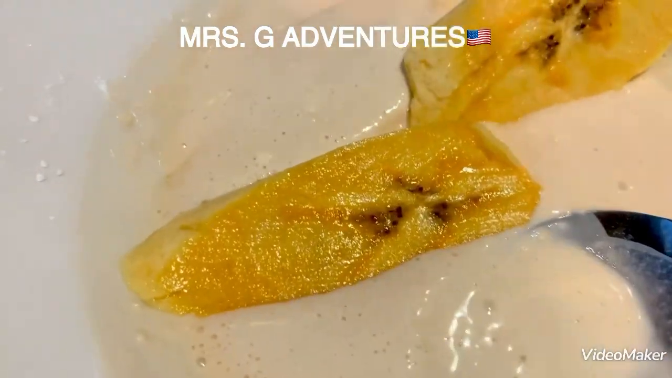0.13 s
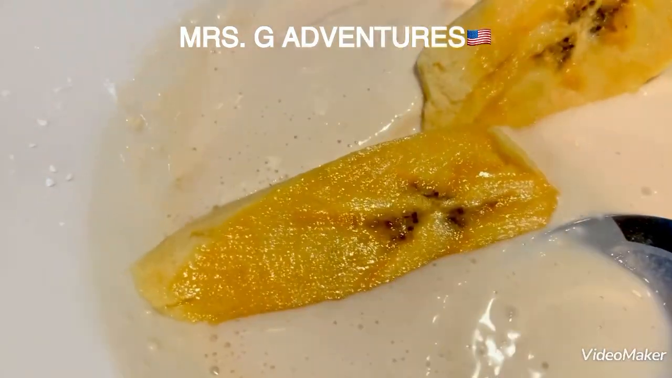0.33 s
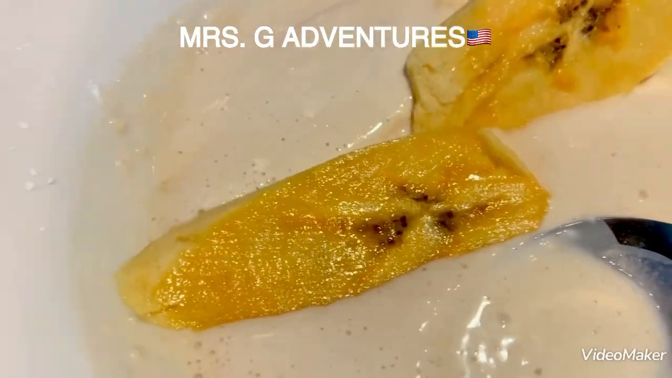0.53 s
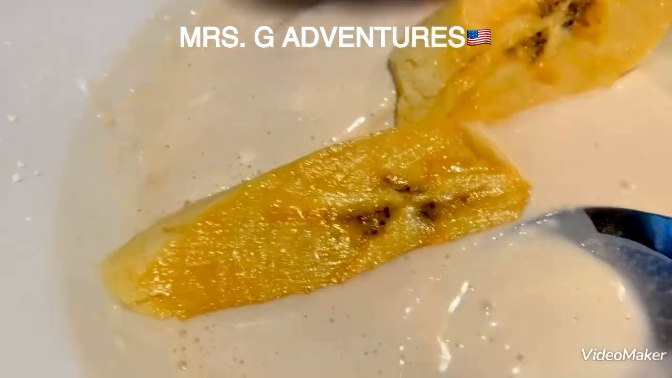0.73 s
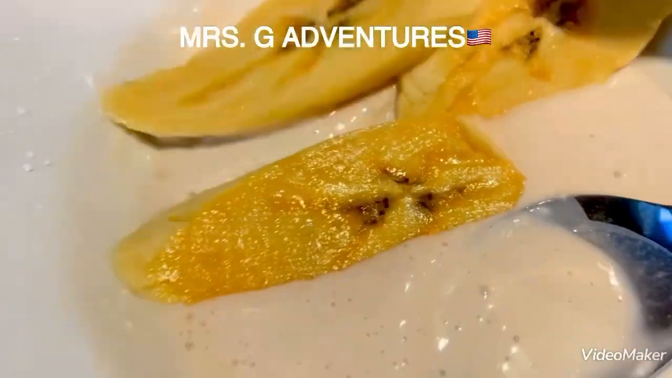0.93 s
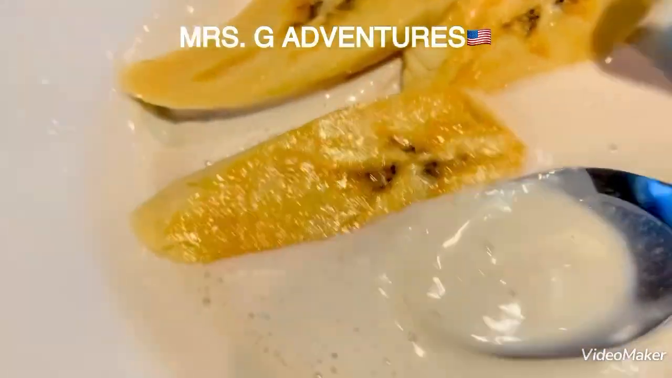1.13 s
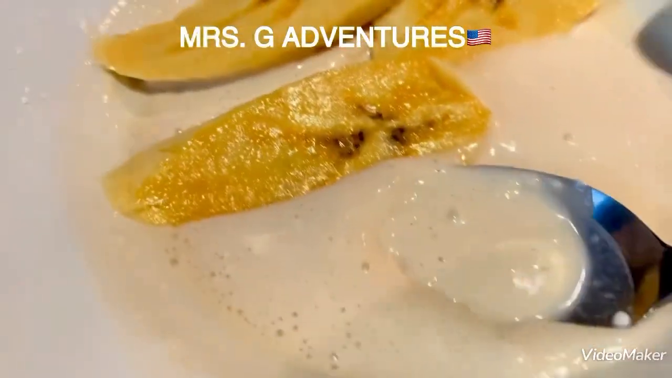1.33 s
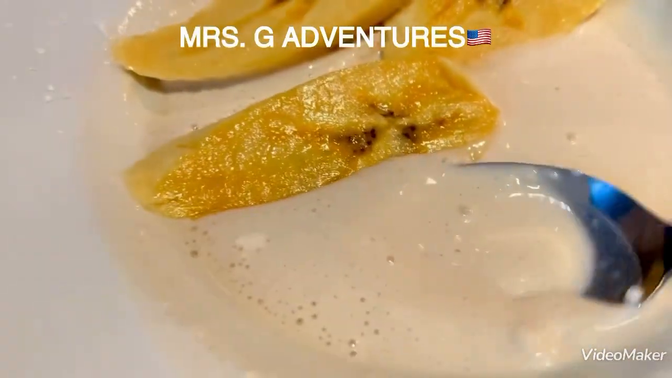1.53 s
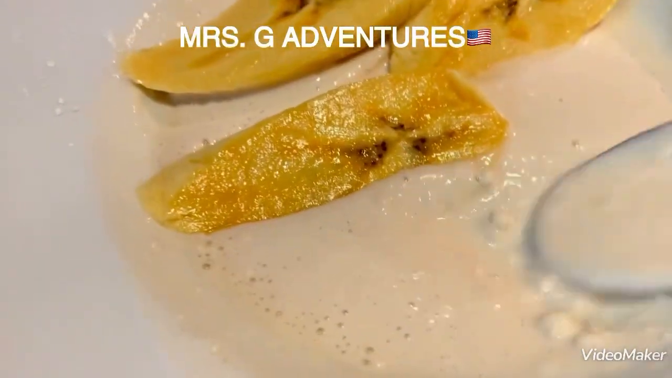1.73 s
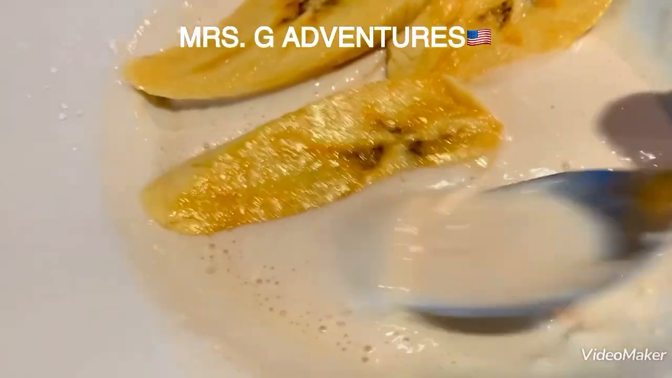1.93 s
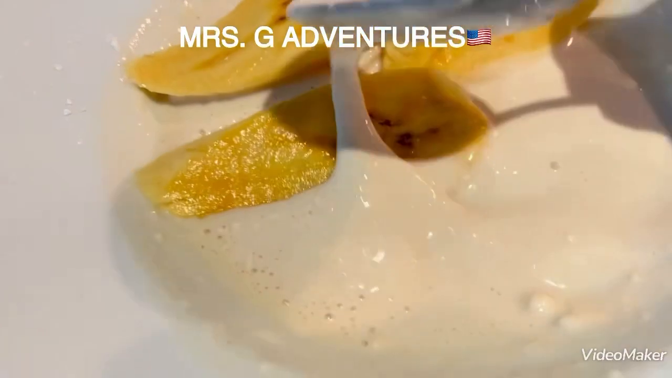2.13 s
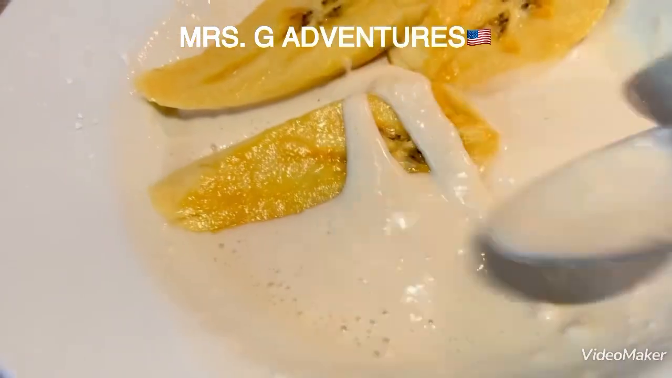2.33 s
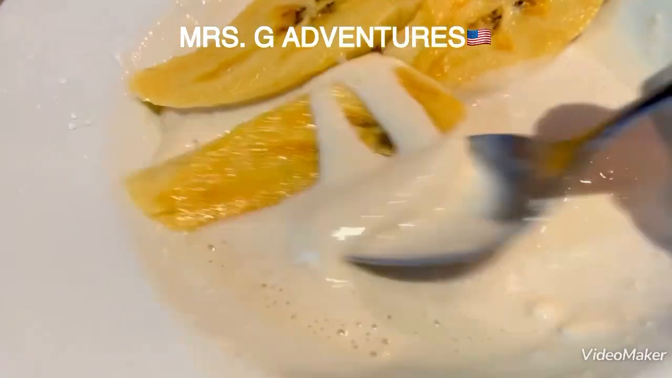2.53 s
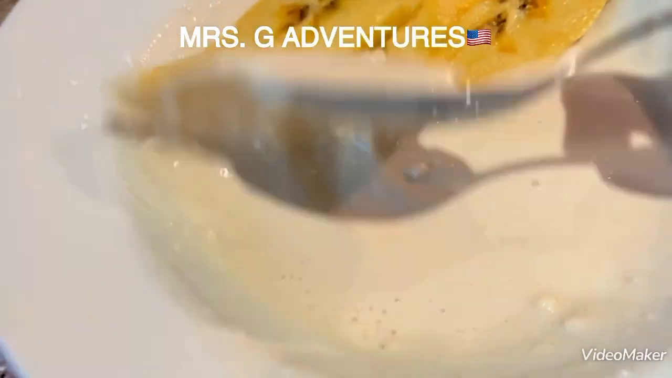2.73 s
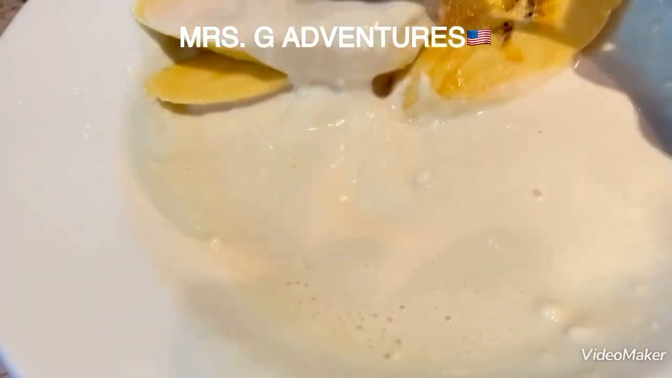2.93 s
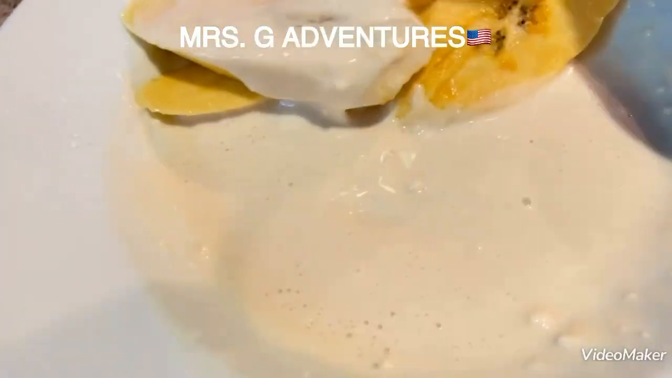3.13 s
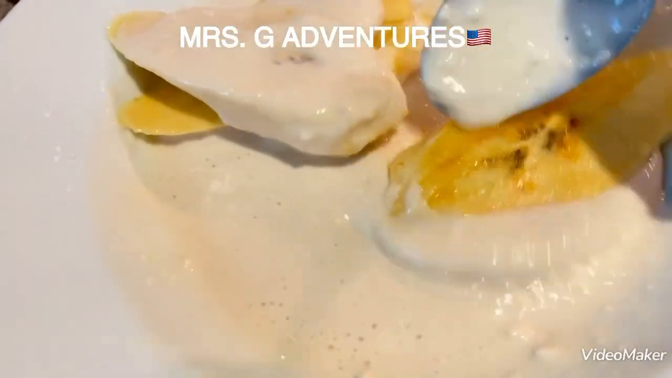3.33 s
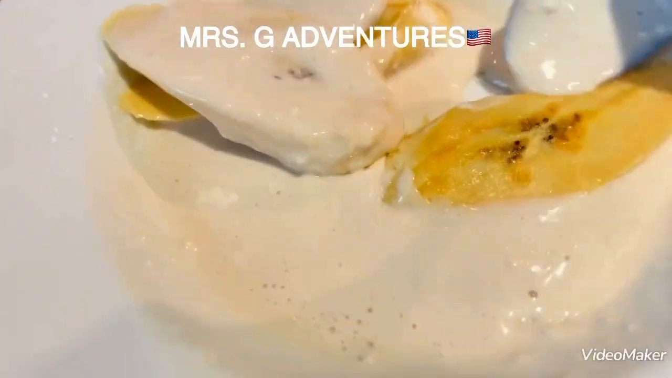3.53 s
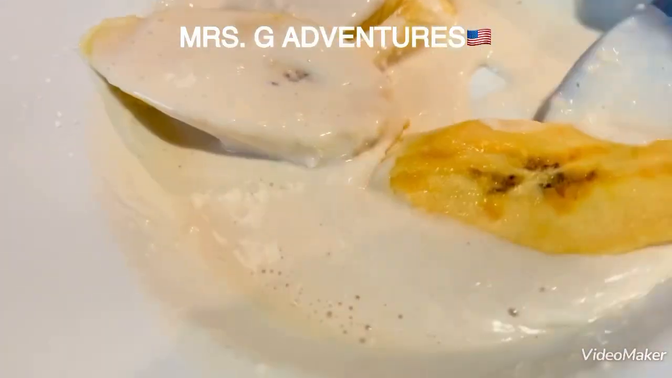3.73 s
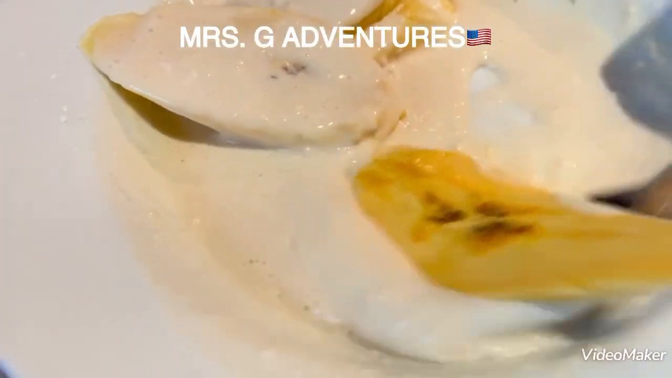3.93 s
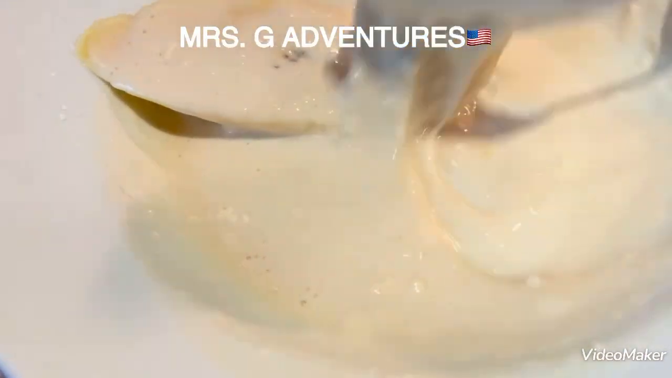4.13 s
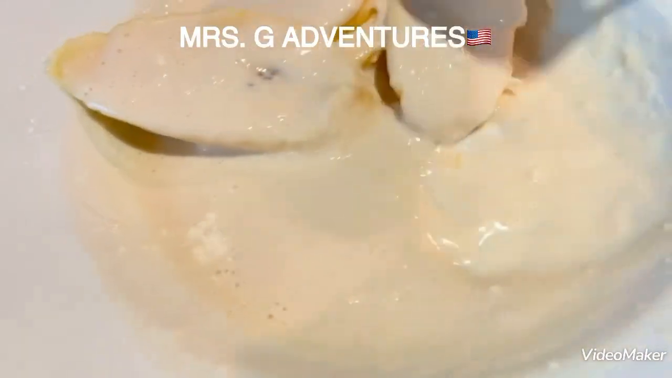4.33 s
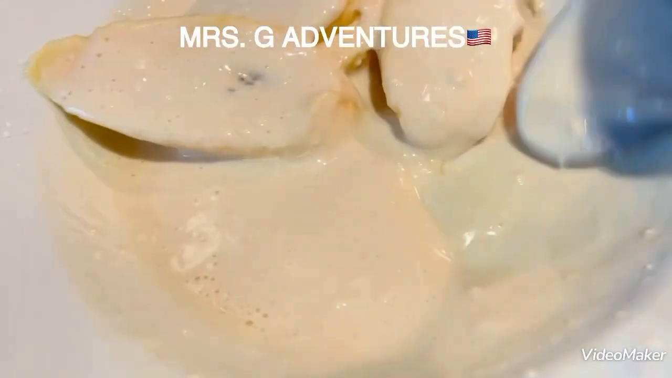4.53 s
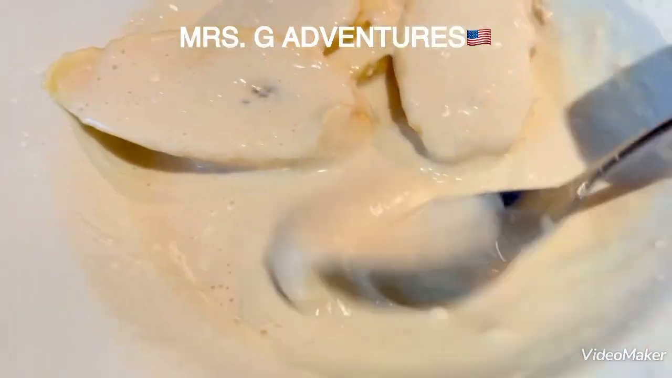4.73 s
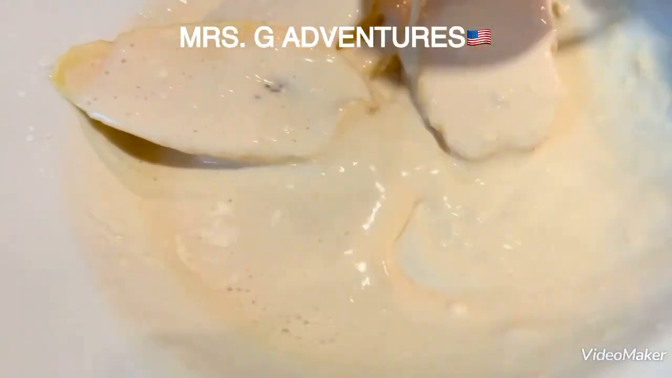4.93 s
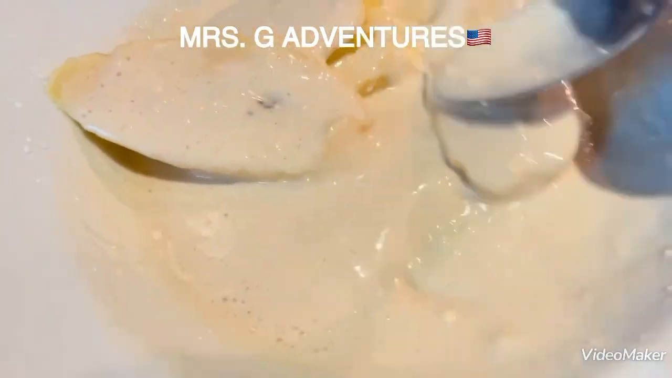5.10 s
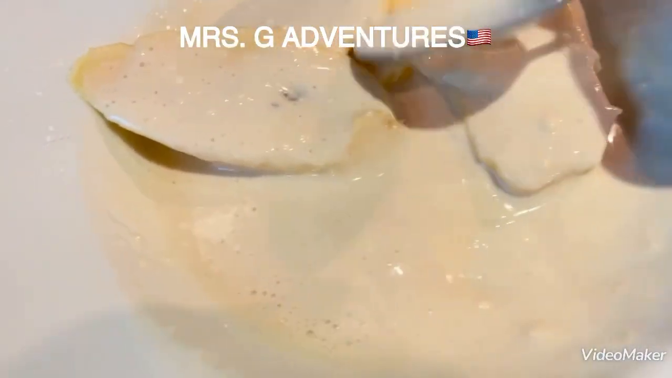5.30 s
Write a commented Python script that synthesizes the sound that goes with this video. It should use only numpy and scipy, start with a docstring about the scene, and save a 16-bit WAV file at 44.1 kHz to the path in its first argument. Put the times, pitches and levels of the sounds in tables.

```python
"""Spoon turning battered fruit on a plate

A steel spoon turns slices of fruit in thick batter on a ceramic plate, close by in a kitchen.
Blows: damped modes of spoon and plate, a bright noise tick and a thud of low, dense counter modes.
Strokes: random slips on the glaze drive the same modes. Batter: short high snaps and fizzing noise.
Under it all a low appliance hum of shaped noise; a small room adds reflections and a faint tail."""
import sys
import numpy as np
from scipy import signal
from scipy.fft import rfft, irfft, next_fast_len
from scipy.io import wavfile

SR = 44100
rng = np.random.default_rng(int(sys.argv[2]) if len(sys.argv) > 2 else 0)


def persist_wave(psi):
    """Save psi, clipped to +-1, as 16-bit WAV."""
    counts = np.round(np.clip(psi, -1, 1) * 32767).astype(np.int16)
    wavfile.write(sys.argv[1], SR, np.atleast_2d(counts).T)


N = 236618
TIME_S = np.arange(N) / SR
RING_TIME_S = TIME_S[:16384]

# hum spectrum: (frequency [Hz], level [dB])
HUM_SPECTRUM = [(25, -21), (52, -3), (88, 3.5), (135, -10.5), (195, -2), (320, -2.5), (410, -6), (540, -18),
                (1050, -23), (2200, -29), (3900, -33.5), (5300, -42), (8900, -48), (11000, -37.5),
                (12600, -59.5), (15000, -73.5)]
# hum, side against mid: (frequency [Hz], level [dB])
HUM_SIDE_SPECTRUM = [(80, -27), (220, -21.5), (700, -2), (4000, -11)]
# largest films of batter snap: (time [s], level [dB])
FILM_SNAPS = [(.1183, -19), (.637, -21), (.7095, -25.5), (.787, -19), (2.435, -18), (2.698, -18.5),
              (2.738, -26), (4.7463, -15.5), (4.9799, -1.5), (5.054, -24.5)]
# batter tears as slices pull free: (peak time [s], length [s], level [dB])
TEARS = [(.63, 0.064, -71), (0.778, 0.032, -49.5), (2.733, 0.086, -63.5), (4.221, .015, -40.5),
         (5.029, 0.048, -66)]
# spoon strokes over the glaze: (peak time [s], length [s], rasp level [dB])
STROKES = [(0.126, 0.04, -54.5), (1.116, 0.019, -39), (1.537, 0.02, -30), (1.764, 0.042, -49.5),
           (2.843, 0.009, -43.5), (3.849, 0.072, -54), (4.716, 0.028, -49.5)]
# spoon meets plate: (time [s], strength [dB], contact cut-off [Hz], plate ring re strength [dB],
# counter thud re strength [dB], gap to first rebound [s]); gaps up to 2 ms give no rebound
SPOON_BLOWS = [ (.861, -7, 5000, 0, 4.5, 0), (1.107, -10, 3200, 11, -1.5, 0),
               (1.171, -15.5, 3060, -14, -16, 0), (1.2184, 9, 9500, 11.5, -3, .0261),
               (1.6643, -9, 3700, -10, -4, 0.00034), (1.755, -21, 6260, 16, -9, 0),
               (1.8403, 16, 2480, -7.5, -8, 0), (2.3657, 17.5, 5700, -12.5, -23, 0),
               (2.4427, 0, 3000, 0, -24.5, 0.0047), (2.8466, 2.5, 2800, -8, -7, 0),
               (3.249, -4, 3600, -18, -3.5, 0), (3.5753, 19, 4450, 12, -5, .0306),
               (3.777, -17, 3880, -1, -6, 0), (3.985, 28.5, 1120, -19, -7.5, 0),
               (4.2126, -7.5, 5200, 0, 6.5, 0.0034), (4.542, 15, 2500, -3, -10.5, 0),
               (4.5652, 15.5, 3030, 5.5, -8.5, 0.022), (4.981, -10, 2057, 0, -9, 0)]
# quickly damped modes, spoon pressed on plate: (frequency [Hz], spectral peak [dB], t60 [s])
CLACK_MODES = [(768, -14.5, 0.0067), (1028, -1, 0.03), (1444, -14, .022), (1747, 1, 0.023),
               (2320, -9, 0.016), (2820, -3.5, 0.035), (3805, -2.5, 0.017), (4190, -9, 0.0045),
               (6010, -4, 0.027), (6430, -11, 0.028), (7940, -3, 0.0073), (9800, -17.5, 0.006),
               (11100, -11, 0.036)]
# plate mode pitches: (frequency [Hz])
PLATE_PITCHES_HZ = [1027, 1685, 2799, 3470, 3967, 6422, 6800, 7120, 9400]
# plate modes, in the order of the pitches: (spectral peak [dB], t60 [s])
PLATE_MODES = [(-6, 0.036), (-3.5, 0.078), (-6.5, 0.17), (-16.5, 0.014), (0.5, 0.065), (-1.5, 0.1),
               (-5, 0.043), (-16.5, 0.026), (-7, 0.054)]
# spoon mode pitches: (frequency [Hz])
SPOON_PITCHES_HZ = [1690, 1880, 3176, 3820, 4090, 5143, 7838, 9540, 11140]
# spoon modes, in the order of the pitches: (spectral peak [dB], t60 [s])
SPOON_MODES = [(-13, 0.14), (-9.5, 0.036), (-21, 0.15), (-15.5, 0.013), (-11, .04), (-5.5, 0.13),
               (-15.5, 0.066), (-12.5, 0.099), (-4.5, 0.026)]
# counter thud spectrum, a dense crowd of low modes: (frequency [Hz], level [dB])
COUNTER_SPECTRUM = [(50, -21.5), (100, -4.5), (170, -0.5), (300, 0.5), (400, -2.5), (520, -7), (720, -5.5),
                    (1050, -13), (2000, -38.5)]
# spectrum of rasp and crack on the glaze: (frequency [Hz], level [dB])
RASP_SPECTRUM = [(100, -25), (500, -14.5), (1000, -5), (1800, 1), (2500, 1.5), (3900, -5), (4800, -11.5),
                 (6500, -5.5), (8200, -6.5), (9000, -12.5), (10500, -0.5), (11500, 0.5), (12400, -20),
                 (14000, -38.5)]
# spectrum of contact ticks and batter noise: (frequency [Hz], level [dB])
TICK_SPECTRUM = [(200, -30), (1500, -13.5), (4000, -20.5), (5000, -20), (7800, -8.5), (9000, -17.5),
                 (11100, 1), (13000, -12.5)]
# microphone response: (frequency [Hz], level [dB])
MIC_RESPONSE = [(11400, 0), (12300, -10.5), (13200, -15), (15000, -26)]
# left port re right: (frequency [Hz], phase lead [rad], level [dB])
PORT_DIFFERENCE = [(101, 0.0029, 0.33), (491.7, 0.14, -3.5), (1280, 0.68, -1.2), (2160, 0.66, 0.5),
                   (4440, 0.59, -2), (6470, 0.088, 0), (11000, 0, 0)]
# span in which the spoon rings freely; batter and fingers muffle it otherwise: (start [s], end [s])
SPOON_FREE_SPAN_S = (1.05, 1.6)

HUM_DB, DIP_DB, DIP_S, DIP_LENGTH_S = -54, -16, 1.337, 0.054
# film pitch rises with strength; SNAP_HZ is the pitch at 0 dB
SNAPS_PER_S, SNAP_DB, SNAP_SCATTER_DB = 20, -31.5, 2.5
SNAP_HZ, SNAP_HZ_PER_DB, SNAP_T60_S = 10920, 64, .0018
RELEASE_SHARE = .8  # stroke decay re its length
# skid after a blow with contact above BARE_HZ (bare glaze); SKID_DB at 0 dB strength
SKID_DELAY_S, SKID_RISE_S, SKID_FALL_S = 0.042, 0.035, 0.036
SKID_DB, SKID_DB_PER_DB, BARE_HZ = -57, 0.85, 1800
SPOON_STRUCK_DB, SPOON_RUBBED_DB, SPOON_MUFFLED_DB = 18.5, 18.5, -31
# late spoon ring: close pairs of modes beat; twins above TWIN_DAMPING_HZ die sooner
SPOON_BEAT_HZ, SPOON_BEAT_DB, TWIN_DAMPING_HZ = 37, -12.5, 5400
# each rebound is weaker, softer and sooner than the contact before
REBOUND_LOSS_DB, REBOUND_CONTACT_SHARE, REBOUND_GAP_SHARE, MIN_GAP_S = 10.5, 0.44, .82, .002
# tick grows with strength and hardness; TICK_DB at 0 dB strength and USUAL_CONTACT_HZ
TICK_DB, TICK_DB_PER_DB, TICK_DB_PER_OCTAVE, USUAL_CONTACT_HZ = -10.5, 0.48, 17.5, 4000
CEILING, TOP_HZ = .5, 15800  # peak limit [full scale], top of the band


def undb(db):
    """Decibels to gain."""
    return 10 ** (np.asarray(db) / 20)


def unit(x):
    """Scale to an rms of one."""
    return x / np.sqrt(np.mean(x ** 2))


def on_bins(points, size):
    """Interpolate a (Hz, value) curve over log frequency on the bins of a transform."""
    hz, value = np.transpose(points)
    bins_hz = np.fft.rfftfreq(size, 1 / SR)
    return np.interp(np.log(bins_hz + 1), np.log(hz), value)


def through(x, response):
    """Convolve each channel, keeping the length."""
    x = np.atleast_2d(x)
    return signal.oaconvolve(x, np.atleast_2d(response), axes=-1)[:, :x.shape[-1]]


def colour(x, points, size=1024):
    """Minimum-phase filter with the given (Hz, dB) spectrum."""
    cepstrum = irfft(np.log(undb(on_bins(points, size))))
    # folded onto positive time: causal
    cepstrum[1:size // 2] *= 2
    cepstrum[size // 2 + 1:] = 0
    return through(x, irfft(np.exp(rfft(cepstrum))))


def soften(x, hz, order=2):
    """Low-pass: a longer contact leaves out the treble."""
    b, a = signal.butter(order, min(hz, SR / 2 - 1000), fs=SR)
    return signal.lfilter(b, a, x)


def burst(t60_s):
    """Dying noise of unit energy, unrelated left and right."""
    decay = np.exp(-np.log(1000) * RING_TIME_S / t60_s)
    x = rng.standard_normal((2, len(RING_TIME_S))) * decay
    return x / np.sqrt(np.sum(x ** 2, axis=1, keepdims=True))


def grains(rate, scatter_db):
    """Random clicks of uneven size, rate per second, at unit rms."""
    clicks = (rng.random(N) < rate / SR) * rng.choice([-1, 1], N)
    size_db = scatter_db * np.clip(rng.standard_normal(N), -2, 2)
    return unit(clicks * undb(size_db))


def add(out, time_s, x):
    """Mix a sound in at a time."""
    start = int(time_s * SR)
    out[:, start:start + x.shape[-1]] += x[..., :N - start]


def ringing(modes, spread):
    """Damped sines (mode, channel, time); port phase difference grows with pitch up to 4 kHz."""
    hz, db, t60_s = np.transpose(modes)[:, :, None, None]
    decay_per_s = np.log(1000) / t60_s
    sign = (-1) ** np.arange(len(modes))[:, None, None]
    side = rng.choice([-1, 1], hz.shape) * np.array([[.5], [-.5]])
    phase_rad = spread * np.minimum(hz / 4000, 1) * side
    envelope = undb(db) * 2 * decay_per_s / SR * np.exp(-decay_per_s * RING_TIME_S)
    return sign * envelope * np.sin(2 * np.pi * hz * RING_TIME_S + phase_rad)


def twins(modes, spread, twin_db, longer, split_hz):
    """Fainter, slightly detuned and longer ringing partners of the modes."""
    hz, db, t60_s = modes.T
    twin_t60_s = t60_s * longer * np.minimum(TWIN_DAMPING_HZ / hz, 1)
    return ringing(np.column_stack([hz + split_hz, db + twin_db, twin_t60_s]), spread)


def twinned(pitches_hz, modes, spread, twin_db, longer, split_hz):
    """Each mode has a faint twin close by that the batter hardly damps."""
    main = np.column_stack([pitches_hz, modes])
    return ringing(main, spread) + twins(main, spread, twin_db, longer, split_hz)


def struck(shapes, scatter_db):
    """Sum of modes; each point of contact weights them a little differently."""
    return np.tensordot(undb(scatter_db * rng.standard_normal(len(shapes))), shapes, 1)


def muffling_db(time_s):
    """Gain on the spoon's own ring: 0 dB while free, low while muffled."""
    return 0 if SPOON_FREE_SPAN_S[0] < time_s < SPOON_FREE_SPAN_S[1] else SPOON_MUFFLED_DB


def hum():
    """Steady low rush of a kitchen appliance, dipping briefly once; bass alike at both ports."""
    mid, side = rfft(rng.standard_normal((2, N))) * undb(on_bins(HUM_SPECTRUM, N))
    side = side * undb(on_bins(HUM_SIDE_SPECTRUM, N))
    rush = unit(irfft([mid + side, mid - side], N))
    dip = np.exp(-((TIME_S - DIP_S) / DIP_LENGTH_S) ** 2)
    return rush * undb(HUM_DB + DIP_DB * dip)


def kitchen(x):
    """Quick treble reflections from plate and counter, then a faint tail from the walls."""
    delayed = np.roll(burst(.035), int(0.0013 * SR), axis=1)
    early = signal.lfilter(*signal.butter(2, 700, "high", fs=SR), delayed)
    late = soften(burst(0.32) * (1 - np.exp(-RING_TIME_S / .008)), hz=7000)
    return x + through(x, undb(-10.0) * early + undb(-17.5) * late)


def batter():
    """Films snap as a short high ring with a splutter; fine bubbles fizz as slices pull free."""
    out, snaps = np.zeros((2, N)), list(FILM_SNAPS)
    # small films: one per time slot, at random within it
    for peak_s, length_s, _ in TEARS:
        for slot_s in np.arange(peak_s - length_s, peak_s + length_s, 1 / SNAPS_PER_S):
            snap_s = slot_s + rng.random() / SNAPS_PER_S
            snaps.append((snap_s, SNAP_DB + SNAP_SCATTER_DB * rng.standard_normal()))
    for snap_s, db in snaps:
        film = ringing([(SNAP_HZ + SNAP_HZ_PER_DB * db, 0, SNAP_T60_S)], spread=0.83)[0]
        splutter = colour(burst(0.0022)[0] + 0.23 * burst(0.033), TICK_SPECTRUM)
        add(out, snap_s, undb(db) * (film + undb(-1.0) * splutter))
    tearing = sum(undb(db) * np.exp(-((TIME_S - peak_s) / length_s) ** 2)
                  for peak_s, length_s, db in TEARS)
    bubbles = grains(rate=700, scatter_db=5) + 0.62 * rng.standard_normal((2, N))
    return out + colour(tearing * bubbles, TICK_SPECTRUM)


def drags(clack, plate, spoon):
    """Strokes and skids: jerky slips rasp and stir the plate; in a stroke the free spoon sings."""
    rasp, push = np.zeros(N), np.zeros(N)
    jerks = unit(soften(rng.standard_normal(N), hz=90))
    slips = unit(grains(rate=1100, scatter_db=5) + .5 * grains(rate=5000, scatter_db=3))
    slips = slips * undb(3 * jerks)
    strokes = [(peak_s, length_s, RELEASE_SHARE * length_s, db, muffling_db(peak_s))
               for peak_s, length_s, db in STROKES]
    skids = [(blow_s + SKID_DELAY_S, SKID_RISE_S, SKID_FALL_S,
              SKID_DB + SKID_DB_PER_DB * db, SPOON_MUFFLED_DB)
             for blow_s, db, hz, *_ in SPOON_BLOWS if hz > BARE_HZ]
    for peak_s, rise_s, fall_s, db, muffled_db in strokes + skids:
        near = slice(max(int((peak_s - 3 * rise_s) * SR), 0), int((peak_s + 5 * fall_s) * SR))
        t_s = TIME_S[near] - peak_s
        pressure = np.exp(-np.where(t_s < 0, (t_s / rise_s) ** 2, t_s / fall_s))
        force = unit(slips[near] * pressure) * np.sqrt(np.mean(pressure ** 2)) * undb(db)
        rasp[near] += force
        push[near] += force * undb(SPOON_RUBBED_DB + muffled_db)
    grit = undb(0.5) * colour(burst(0.012)[0] + undb(-18.5) * burst(0.026), RASP_SPECTRUM)
    glaze = grit + undb(-4.5) * clack.sum(0) + undb(-2) * plate.sum(0)
    return through(rasp, glaze) + through(push, undb(3.5) * spoon.sum(0))


def rebounds(time_s, db, hz, gap_s, count):
    """(time [s], strength [dB], contact [Hz]) of a blow and of the rebounds after it."""
    contacts = [(time_s, db, hz)]
    for _ in range(count if gap_s > MIN_GAP_S else 0):
        time_s += gap_s
        db -= REBOUND_LOSS_DB
        hz *= REBOUND_CONTACT_SHARE
        gap_s *= REBOUND_GAP_SHARE
        contacts.append((time_s, db, hz))
    return contacts


def counter_thud():
    """Dense low counter modes as shaped noise bursts, with a longer, darker tail."""
    noise = burst(0.094)[0] + undb(-2.0) * burst(0.17)[0] + undb(-20.5) * burst(0.18)
    tail = soften(colour(burst(0.39)[0], COUNTER_SPECTRUM), hz=260)
    return undb(-5.5) * colour(noise, COUNTER_SPECTRUM) + undb(-10.5) * tail


def blows(clack, plate, spoon):
    """Each contact clacks, ticks and rings the plate; the first also drives spoon and counter."""
    out = np.zeros((2, N))
    impulse = signal.unit_impulse(len(RING_TIME_S))
    for blow_s, blow_db, blow_hz, plate_db, thud_db, gap_s in SPOON_BLOWS:
        steel = undb(SPOON_STRUCK_DB + muffling_db(blow_s)) * struck(spoon, scatter_db=1.2)
        thud = undb(thud_db) * counter_thud()
        add(out, blow_s, undb(blow_db) * (soften(steel, 1.3 * blow_hz) + thud))
        for contact_s, db, hz in rebounds(blow_s, blow_db, blow_hz, gap_s, count=2):
            crack = colour(burst(0.022)[0] + undb(-4.5) * burst(0.062), RASP_SPECTRUM)
            body = struck(clack, scatter_db=0.3) + undb(-9.5) * crack
            body = soften(body, 1.117 * hz, order=3)
            ring = undb(plate_db) * soften(struck(plate, scatter_db=1.5), 1.3 * hz)
            tick = colour(.5 * impulse + 1.2 * burst(0.013)[0], TICK_SPECTRUM)
            hardness_octaves = np.log2(hz / USUAL_CONTACT_HZ)
            tick_db = TICK_DB + TICK_DB_PER_DB * db + TICK_DB_PER_OCTAVE * hardness_octaves
            add(out, contact_s, undb(db) * (body + ring) + undb(tick_db) * tick)
    return out


def scene():
    """Spoon, plate and batter in the room, over the hum."""
    clack = ringing(CLACK_MODES, spread=.45)
    plate = twinned(PLATE_PITCHES_HZ, PLATE_MODES, spread=.7, twin_db=-20.5, longer=3.0, split_hz=4.5)
    spoon = twinned(SPOON_PITCHES_HZ, SPOON_MODES, spread=0.19, twin_db=-11.5, longer=5.5, split_hz=2.8)
    spoon = spoon + twins(np.column_stack([SPOON_PITCHES_HZ, SPOON_MODES]), spread=.3,
                          twin_db=SPOON_BEAT_DB, longer=7.0, split_hz=SPOON_BEAT_HZ)
    close = batter() + drags(clack, plate, spoon) + blows(clack, plate, spoon)
    return hum() + kitchen(close)


def record(dry):
    """Two close microphone ports differ in phase and level, round hard peaks and lose top treble."""
    size, ports, half = next_fast_len(N), np.array(PORT_DIFFERENCE), np.array([[.5], [-.5]])
    phase_rad = half * on_bins(ports[:, :2], size)
    level_db = half * on_bins(ports[:, ::2], size)
    pair = np.exp(1j * phase_rad) * undb(level_db)
    at_ports = irfft(rfft(dry, size) * pair, size)[:, :N]
    heard = colour(CEILING * np.tanh(at_ports / CEILING), MIC_RESPONSE)
    return signal.sosfilt(signal.ellip(8, .2, 70, TOP_HZ, fs=SR, output="sos"), heard)


dry = scene()
out = record(dry)
persist_wave(out)
```